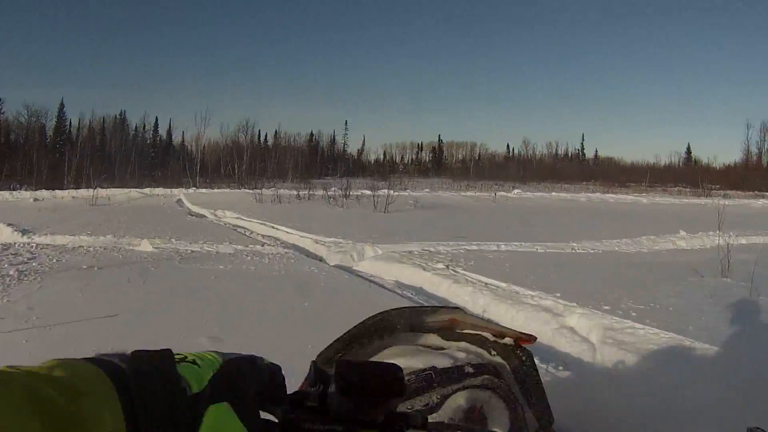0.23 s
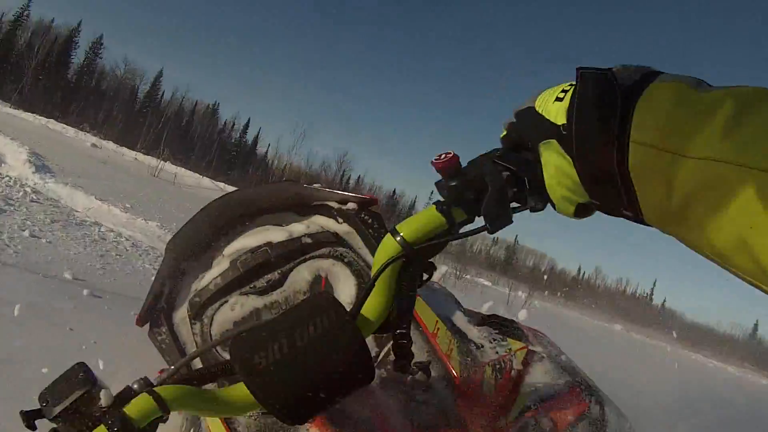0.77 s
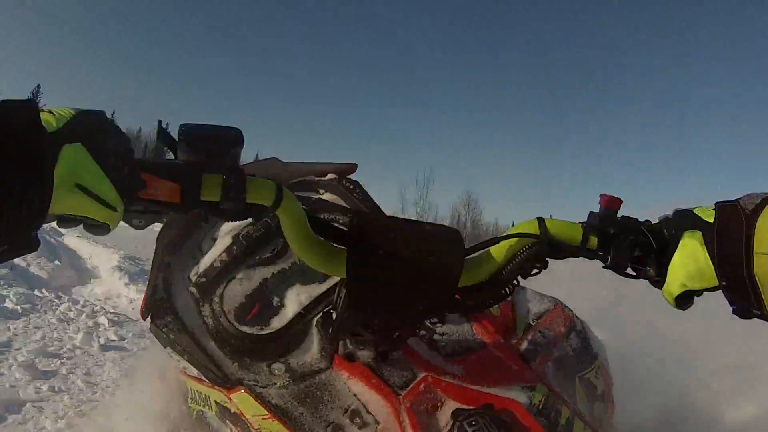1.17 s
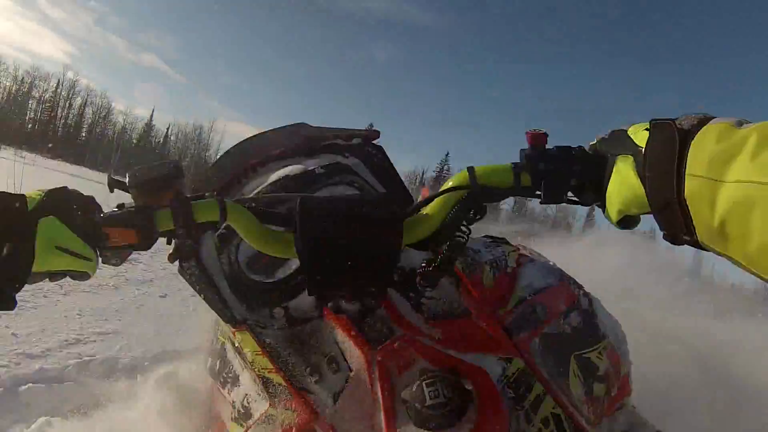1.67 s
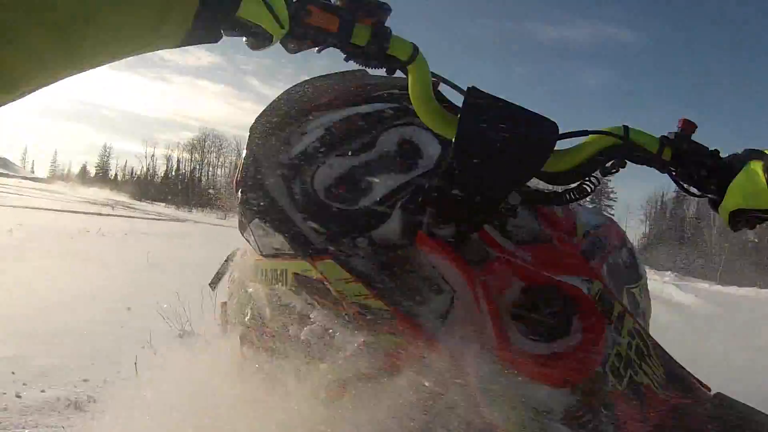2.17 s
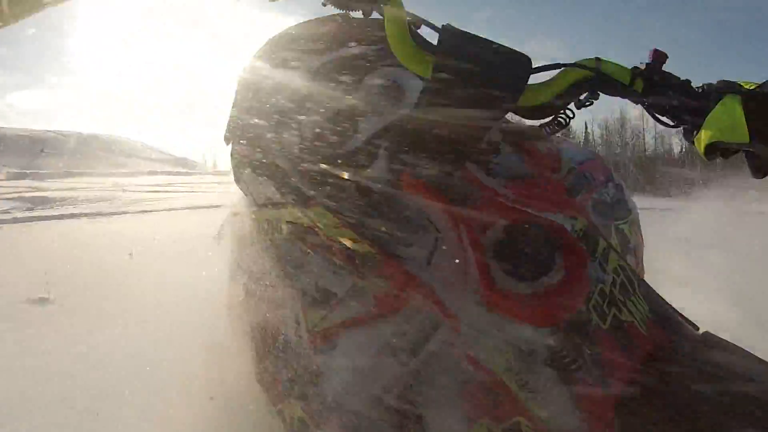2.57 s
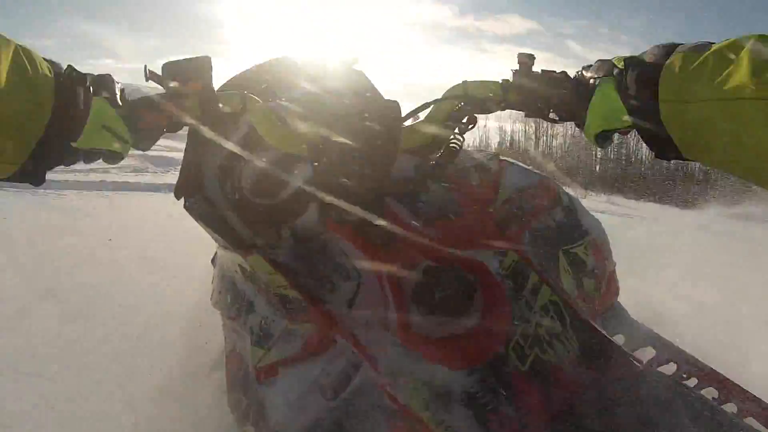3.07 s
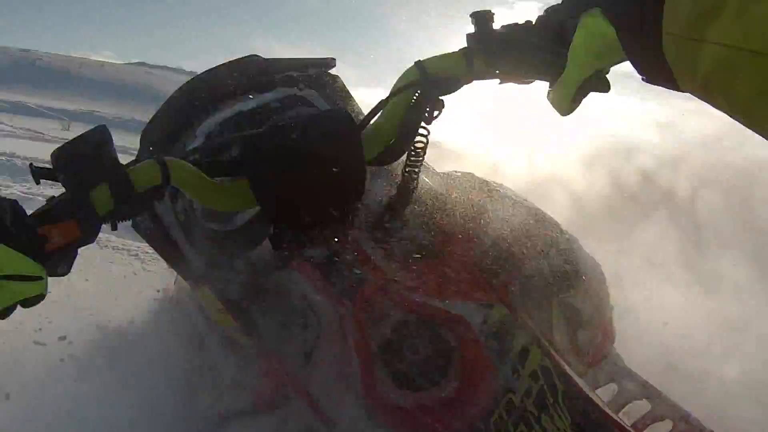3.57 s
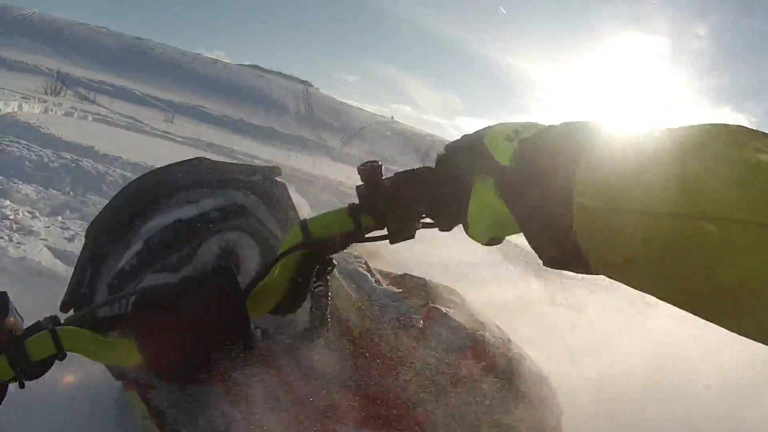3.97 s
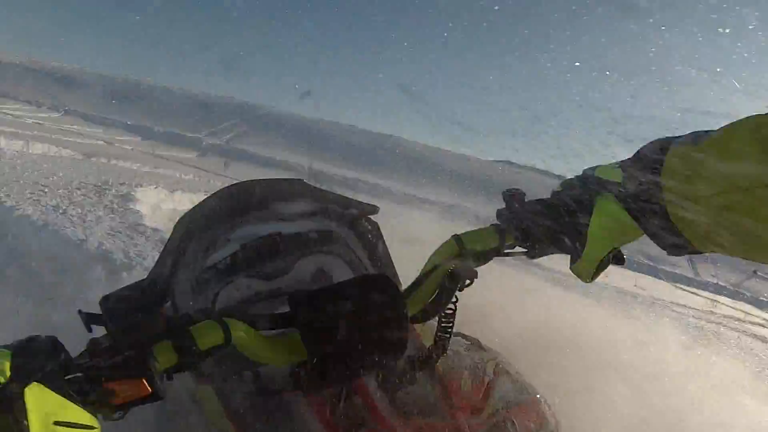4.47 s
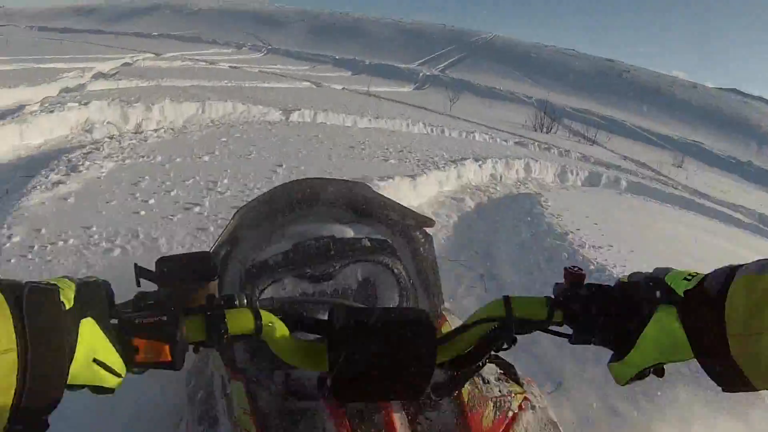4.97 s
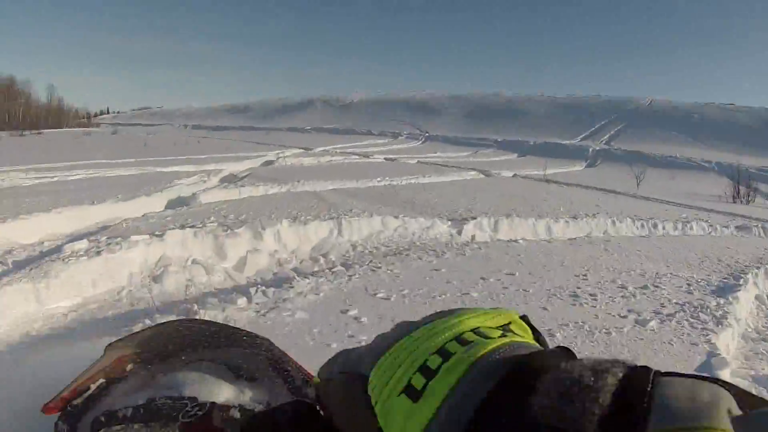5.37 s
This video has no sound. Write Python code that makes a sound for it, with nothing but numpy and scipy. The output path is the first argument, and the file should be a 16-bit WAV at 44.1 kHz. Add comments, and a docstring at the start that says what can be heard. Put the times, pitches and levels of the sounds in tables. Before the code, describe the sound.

Close two-stroke snowmobile engine surging and holding high revs through deep powder, with light wind buffeting and snow spray hitting the microphone.

```python
"""A two-stroke snowmobile ploughs through deep powder, heard close up from a microphone on the rider.
The engine is blipped, held at full revs, then blipped again: its firing pulses howl in the tuned pipe,
the intake rasps and the clutch drones below. Air buffets the microphone; thrown snow patters on its
housing, and a few hard lumps click against it, one much louder than the rest."""
import sys
import numpy as np
from scipy import signal
from scipy.fft import rfft, irfft, next_fast_len
from scipy.io import wavfile
from scipy.ndimage import map_coordinates

SR = 44100
rng = np.random.default_rng(int(sys.argv[2]) if len(sys.argv) > 2 else 0)


def pcm_store(signal):
    """Save signal as 16-bit PCM."""
    levels = np.round(np.clip(np.atleast_2d(signal), -1, 1) * 32767)
    wavfile.write(sys.argv[1], SR, levels.astype(np.int16).T)


N = 248283
T = np.arange(N) / SR

# engine surges (the throttle opening, or the howl jumping as the engine comes on the pipe): start/s,
# rise/s, hold/s, fall/s, howl and pipe level/dB as at full revs, delay/ms of the reflection off the sled
SURGES = [(0.0, 0.028, 0.18, 0.041, -40, -51, 1.9), (0.234, .04, 0.19, .03, -28.5, -26, 0.55),
          (.47, 0.062, 0.14, 0.089, -17.5, -23, 1.13), (.79, 0.057, 0.13, 0.023, -21, -42, 2.02),
          (.955, .04, 2.605, .025, -18.5, -17, 1.36), (3.7, 0.044, .012, 0.032, -24, -33, 1.8),
          (3.84, 0.095, .25, 0.041, -22.5, -37, 3.515), (4.18, 0.058, .105, 0.081, -16, -16, 3.4),
          (4.8, 0.11, 0.096, 0.024, -29, -37, 1.6), (5.34, 0.092, .2, 0.041, -28.5, -32, 1.62)]
# shifts as the sled rears and sinks in the long pull: t/s, howl level/dB, pipe level/dB, delay/ms
REARING = [(1.02, 4, 0.5, -0.19), (1.3, -4.5, -10.5, 0.35), (1.68, -1, 3, 0.02), (2.13, 0, -1.5, 0.018),
           (2.25, -5.5, -4.5, 0), (2.42, -3.5, 0, -0.057), (2.86, .5, -7, 0.086), (3.03, 0, -2, 0.11),
           (3.2, -1.5, 2, .38), (3.58, 0, -3.5, 0.061)]
# firing rate of the engine: t/s, f/Hz
FIRING_RATE = [(0.0, 192), (0.11, 196.1), (0.53, 260), (0.66, 263.4), (0.7, 254.8), (0.86, 205.8),
               (0.89, 204.2), (1.1, 231.9), (1.43, 236.3), (1.61, 243.3), (1.79, 240.7), (2.02, 255),
               (2.16, 257.7), (2.38, 238.2), (2.52, 242.7), (3.37, 242.5), (3.59, 230.5), (3.73, 176.0),
               (3.86, 151.1), (3.95, 156.2), (4.2, 223), (4.33, 245.9), (4.48, 247.6), (4.53, 230.8),
               (4.69, 164), (4.78, 151.5), (4.88, 160.9), (4.99, 190.5), (5.05, 191.2), (5.3, 157.8),
               (5.33, 161.3), (5.49, 206.1), (5.63, 242)]
# strength of the firing fundamental: t/s, relative level/dB
FUNDAMENTAL_LEVEL = [(0.0, -31), (0.22, -45), (0.36, -29.5), (0.77, -23.5), (0.92, -37), (1.36, -27.5),
                     (3.61, -31), (3.78, -43), (4.45, -29.5), (4.81, -42.5), (5.03, -27.5), (5.1, -49),
                     (5.54, -35), (5.63, -27)]
# colour of the exhaust overtones at full load: f/Hz, level/dB
EXHAUST_COLOUR = [(480, -17), (720, -24.5), (950, -16), (1200, -9.5), (1400, -17.5), (1600, -1),
                  (2150, -8.5), (2400, -14.5), (2700, -3), (2950, -10.5), (3250, -33), (5300, -28),
                  (6000, -41)]
# intake and exhaust turbulence: f/Hz, level/dB
RASP_SPECTRUM = [(300, -16), (850, -23), (1130, -5), (1380, -17), (1600, 1), (1750, 3.5), (2050, -6.5),
                 (2400, -6.5), (2750, -1), (3050, -10), (3400, -30)]
# resonance of the intake: f/Hz, level/dB
AIRBOX_SPECTRUM = [(1000, -19.5), (1400, -19), (1600, -0.5), (1780, -1), (2050, -21.5), (2400, -22.5)]
# high hiss of the gas: f/Hz, level/dB
HISS_SPECTRUM = [(2500, -2), (3300, 3), (4500, -0.5), (5300, 4), (6700, -10), (7500, -2.5), (10000, -11.5),
                 (15000, -24.5)]
# the track digging into the snow: f/Hz, level/dB
CHURN_SPECTRUM = [(70, -14), (120, -5), (600, -4.5), (1500, -7.5)]
# resonances of the muffler: f/Hz, level/dB
MUFFLER_COLOUR = [(250, -1), (315, 3.5), (375, -15), (470, -6), (580, -3), (720, -3), (900, -11)]
# air on the microphone: t/s, level/dB
WIND_LEVEL = [(0, -60), (2.2, -45), (3.1, -46), (5.6, -49)]
# snow plumes reaching the housing: start/s, rise/s, hold/s, fall/s, relative level/dB
SNOW_PLUMES = [(1.6, .14, 0.0099, 0.055, -47), (2.15, .2, .82, .14, -46), (2.78, .2, .16, .02, -37),
               (3.601, 0.13, .5, 0.098, -57), (4.281, .07, 0.073, 0.053, -40),
               (4.48, .11, .21, 0.15, -38.5)]
# powder striking the housing: f/Hz, level/dB
POWDER_SPECTRUM = [(500, 1), (3500, 4.5), (10000, 4), (15500, -3.5)]
# hard bits of snow striking the housing: t/s, relative peak level/dB
SNOW_LUMPS = [(3.8615, -31), (4.6834, -18), (4.8386, -15), (4.991, -19), (5.126, -25.5), (5.0456, -5)]

COAST_HOWL_DB = -41.5  # overtones left with the throttle shut
HOWL_DB_PER_OCTAVE, PIPE_DB_PER_OCTAVE = 11, 11.5  # both grow with the revs
RASP_DB, RASP_DB_PER_OCTAVE, RASP_SHUT_DB = -21.5, 17.5, -5  # base for gas noise and burble together
AIRBOX_DB, AIRBOX_DB_PER_OCTAVE, AIRBOX_SHUT_DB = -28, 10, -9.5  # SHUT: change off the throttle
MISFIRE_JITTER, MISFIRE_DB = .035, 2
CHUG_DB, CHUG_OCTAVES = -38, 0.67  # strongest this far below full revs
CRANK_DB, CRANK_DB_PER_OCTAVE = -44, 12.5
CRUISE_HZ, CLUTCH_HZ = 243.5, 117.3  # steady firing rate, and the clutch's turning rate at that speed
BELT_LAG_S, SHIFT_LAG_S, SHIFT_POWER = 0.031, .4, 1.08  # the belt follows fast, the ratio shifts slowly
DRONE_DB, DRONE_DB_PER_OCTAVE, DRONE_SLACK_DB, DRONE_BUILD_S = -33.5, 7, -10, 0.79
TOP_HZ = 15600


def amp(db):
    """Decibels as amplitude."""
    return 10 ** (np.asarray(db) / 20)


def unit(x):
    """x at rms 1."""
    return x / np.sqrt(np.mean(x ** 2) + 1e-20)


def along(points, hz):
    """A spectrum's level at hz, on a log frequency axis."""
    freqs, levels = np.transpose(points)
    return np.interp(np.log(hz + 1), np.log(freqs), levels)


def curves(rows):
    """One value per sample for each column after the time."""
    times, *columns = np.transpose(rows)
    return [np.interp(T, times, column) for column in columns]


def wobble(rate):
    """A smooth random curve, rate knots a second."""
    coarse = T[::16]
    knots = rng.standard_normal(int(T[-1] * rate) + 4)
    return np.interp(T, coarse, map_coordinates(knots, [coarse * rate]))


def swell(start_s, rise_s, hold_s, fall_s):
    """An envelope from 0 to 1: straight rise, hold, exponential fall."""
    t = T - start_s
    return np.clip(t / rise_s, 0, 1) * np.exp(-np.maximum(t - rise_s - hold_s, 0) / fall_s)


def lagged(x, lag_s):
    """x followed with inertia."""
    keep = np.exp(-1 / (SR * lag_s))
    return x[0] + signal.lfilter([1 - keep], [1, -keep], x - x[0])


def filtered(x, response):
    """x times a response of frequency."""
    size = next_fast_len(N + SR // 2)
    return irfft(rfft(x, size) * response(np.fft.rfftfreq(size, 1 / SR)), size)[:N]


def coloured(x, spectrum):
    """x through a spectrum that falls away above its last point, at rms 1."""
    edge_hz = spectrum[-1][0]
    return unit(filtered(x, lambda hz: amp(along(spectrum, hz)) / np.maximum(hz / edge_hz, 1) ** 2))


def turning(hz):
    """Phase in radians of something that repeats hz times a second."""
    return 2 * np.pi * np.cumsum(hz) / SR


def tone(phase):
    """A sine of rms 1."""
    return np.sqrt(2) * np.sin(phase)


def engine_surges(blend_s=0.091):
    """The engine surges: throttle opening (0-1), howl level/dB, pipe level/dB, reflection delay/ms."""
    rows = np.array(SURGES)
    surges = np.array([swell(*timing) for timing in rows[:, :4]])
    opening = np.minimum(surges.sum(axis=0), 1)
    starts, rise_s, hold_s, _, howl_db, pipe_db, delay_ms = rows.T
    ends = starts + rise_s + hold_s
    howl = amp(COAST_HOWL_DB) + amp(howl_db) @ surges
    pipe = amp(COAST_HOWL_DB - 5) + amp(pipe_db) @ surges
    delay = np.interp(T, np.sort(np.r_[starts, ends]), np.repeat(delay_ms, 2))
    start_s, end_s = REARING[0][0], REARING[-1][0]
    long_pull = np.interp(T, [start_s - blend_s, start_s, end_s, end_s + blend_s], [0, 1, 1, 0])
    howl_shift, pipe_shift, delay_shift = long_pull * curves(REARING)
    return (opening, 20 * np.log10(howl) + howl_shift,
            20 * np.log10(pipe) + pipe_shift, delay + delay_shift)


def exhaust(firing_hz, phase, howl_db, pipe_db, delay_ms, pipe_order=7, top_order=23):
    """Firing harmonics: a moving reflection lifts some and dips others; the tuned pipe locks on to one."""
    howl, power = np.zeros(N), np.zeros(N)
    slack_db = howl_db - howl_db.max()  # how far the engine is from full load
    looseness = 1 - 0.58 * amp(slack_db)  # at full load the harmonics line up into sharper pulses
    for k in np.arange(2, top_order + 1):
        if k == pipe_order:
            continue
        hz = k * firing_hz
        dulling_db = 0.37 * slack_db * np.log2(k / pipe_order)  # less load, duller pulses
        reflection = 0.39 * np.exp(-2j * np.pi * hz * delay_ms / 1000)
        path = amp(along(EXHAUST_COLOUR, hz) + dulling_db) * (1 + reflection)
        drift = np.pi * looseness * wobble(2)
        howl += np.abs(path) * amp(1.74 * wobble(45)) * tone(k * phase + np.angle(path) + drift)
        power += np.abs(path) ** 2
    pipe = amp(pipe_db + wobble(50)) * tone(pipe_order * phase)
    fundamental_db, = curves(FUNDAMENTAL_LEVEL)
    return amp(fundamental_db - 1) * tone(phase) + amp(howl_db) * howl / np.sqrt(power) + pipe


def blowdown(phase, spectrum, depth):
    """Gas noise that surges once per firing."""
    return coloured(rng.standard_normal(N) * np.exp(depth * np.cos(phase)), spectrum)


def burble(firing_hz, phase, top_order=12):
    """The two cylinders fire unequally, putting unsteady lines halfway between the harmonics."""
    lines = np.zeros(N)
    for k in np.arange(1, top_order + 1) + .5:
        db = along(RASP_SPECTRUM, k * firing_hz) - 3.85 * np.log2(k)  # darker than the rasp
        lines += amp(db + 5.7 * wobble(14)) * tone(k * phase + .5 * wobble(25))
    return unit(lines)


def churn(revs, shut):
    """Under the rider, the track digs harder into the snow as the revs rise."""
    db = -44 + 3.7 * revs - 1.5 * shut + 0.47 * wobble(6.4)
    return amp(db) * coloured(rng.standard_normal(N), CHURN_SPECTRUM)


def crankshaft(phase, revs):
    """The crankshaft shakes once a turn, which is once to two firings."""
    return amp(CRANK_DB + CRANK_DB_PER_OCTAVE * revs + 2 * wobble(12)) * tone(phase / 2)


def chug(phase, revs, top_order=4):
    """Below the tuned pipe's range the lowest overtones sweep through the muffler's resonances."""
    firing_hz = np.gradient(phase) * SR / (2 * np.pi)
    off_pipe = np.minimum(-revs / CHUG_OCTAVES, 1)
    lines = np.zeros(N)
    for k in np.arange(2, top_order + 1):
        db = along(MUFFLER_COLOUR, k * firing_hz) + 3.5 * wobble(9)
        lines += amp(db) * tone(k * phase + 0.46 * wobble(12))
    return amp(CHUG_DB) * off_pipe * unit(lines)


def engine(firing_hz, opening, howl_db, pipe_db, delay_ms):
    """The two-stroke at close range, tied to one unsteady crankshaft, and the track that it drives."""
    revs = np.log2(firing_hz / firing_hz.max())  # octaves from full revs, 0 or less
    shut = (1 - opening) ** 2
    # at low revs and off the throttle the cylinders fire unevenly
    jitter = .0008 - 0.013 * revs + MISFIRE_JITTER * shut
    phase = turning(firing_hz * (1 + jitter * wobble(110)))
    sputter = amp((MISFIRE_DB * shut - 1.98 * revs) * wobble(45))
    tones = exhaust(firing_hz, phase, howl_db + HOWL_DB_PER_OCTAVE * revs,
                    pipe_db + PIPE_DB_PER_OCTAVE * revs, delay_ms)
    rasp_db = RASP_DB + RASP_DB_PER_OCTAVE * revs + RASP_SHUT_DB * shut
    rasp = amp(rasp_db - 2) * blowdown(phase, RASP_SPECTRUM, depth=0.11)
    rasp += amp(rasp_db - 6.5 - 4.9 * revs) * burble(firing_hz, phase)
    intake_db = AIRBOX_DB + AIRBOX_DB_PER_OCTAVE * revs + AIRBOX_SHUT_DB * shut
    intake = amp(intake_db) * blowdown(phase, AIRBOX_SPECTRUM, depth=0.56)
    hiss = amp(0.68 * rasp_db + 8.7 * revs - 17) * blowdown(phase, HISS_SPECTRUM, depth=0.059)
    rumble = churn(revs, shut) + crankshaft(phase, revs)
    return sputter * (tones + rasp + intake + opening * chug(phase, revs)) + hiss + rumble


def clutch(firing_hz, opening, corner_hz=86):
    """The driven clutch lags the engine and drones once and twice a turn, beating against it."""
    revs = np.log2(firing_hz / CRUISE_HZ)
    speed = lagged(revs, BELT_LAG_S) + SHIFT_POWER * lagged(revs, SHIFT_LAG_S)  # octaves from cruising
    hz = CLUTCH_HZ * 2 ** speed
    strain = lagged(opening * np.minimum(2 ** speed, 1) ** 2, DRONE_BUILD_S)  # builds under lasting load
    db = DRONE_DB + DRONE_DB_PER_OCTAVE * speed + DRONE_SLACK_DB * (1 - strain) - 3 * (1 - opening)
    phase = turning(hz * (1 + 0.0052 * wobble(25.26)))
    radiated = np.minimum(hz / corner_hz, 1) ** 4  # the panels radiate no deep bass
    return amp(db) * (radiated * amp(1.4 * wobble(16)) * tone(phase) + amp(-0.6) * tone(2 * phase))


def wind(corner_hz=90):
    """Low buffeting right on the microphone, strongest as the sled rears up."""
    db, = curves(WIND_LEVEL)
    gusts = amp(db + 1.7 * wobble(15))
    return gusts * unit(filtered(rng.standard_normal(N), lambda hz: 1 / (1 + (hz / corner_hz) ** 2)))


def spray(grains_per_s=5000, thinnest=0.043):
    """Snow grains of very unequal size hit the housing: a thick cloud hisses, a thin one crackles."""
    cloud = sum(amp(db) * swell(*timing) for *timing, db in SNOW_PLUMES)
    density = np.maximum((cloud / cloud.max()) ** .8, thinnest)
    grains = (rng.random(N) < density * grains_per_s / SR) * rng.choice([-1, 1], N)
    size = amp(3.2 * np.minimum(rng.exponential(size=N), 3.8))
    patter = coloured(grains * size / np.sqrt(density), POWDER_SPECTRUM)
    return cloud * amp(8 + 2.04 * wobble(45)) * patter


def lumps():
    """Hard bits of snow snap on the plastic beside the microphone, which rings for a few cycles."""
    out, t = np.zeros(N + SR), np.arange(SR // 50) / SR
    for start_s, db in SNOW_LUMPS:
        snap = np.sin(2 * np.pi * 5400 * t) * amp(-60 * t / .0016)
        snap += 0.64 * np.sin(2 * np.pi * 9500 * t) * amp(-60 * t / 0.00083)
        snap += 0.17 * rng.standard_normal(len(t)) * amp(-60 * t / 0.023)
        out[round(start_s * SR):][:len(t)] += amp(db + 4.5) * snap / np.abs(snap).max()
    return out[:N]


def scene():
    """Sled, wind and snow from the rider's seat, in mono."""
    firing_hz, = curves(FIRING_RATE)
    opening, howl_db, pipe_db, delay_ms = engine_surges()
    sled = engine(firing_hz, opening, howl_db, pipe_db, delay_ms) + clutch(firing_hz, opening)
    return (sled + wind() + spray() + lumps())[None]


def record(dry):
    """The microphone on the rider passes nothing above its band limit."""
    return filtered(dry[0], lambda hz: hz < TOP_HZ)[None]


dry = scene()
out = record(dry)
pcm_store(out)
```